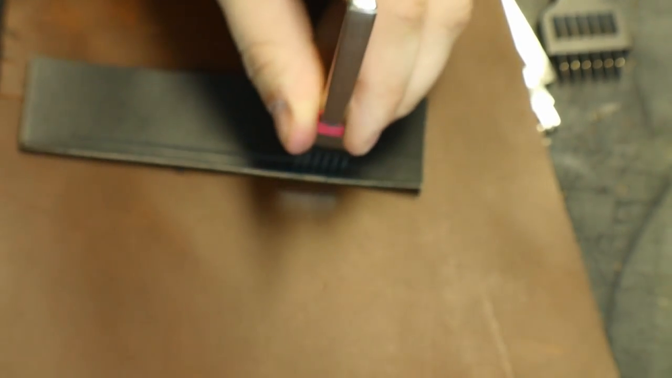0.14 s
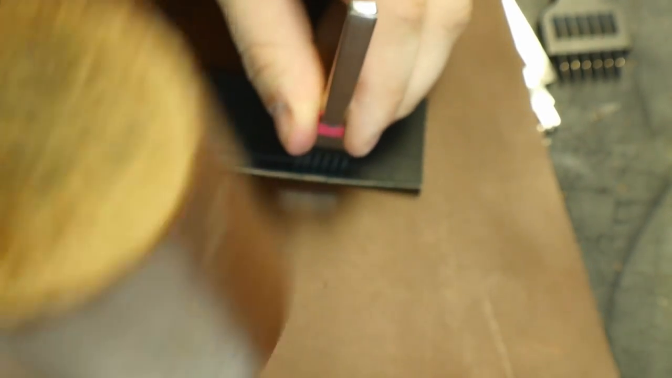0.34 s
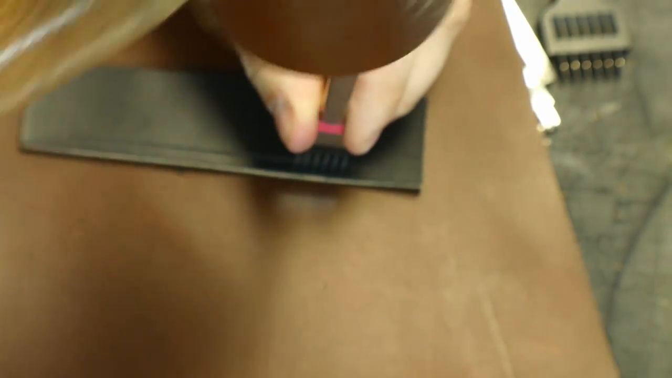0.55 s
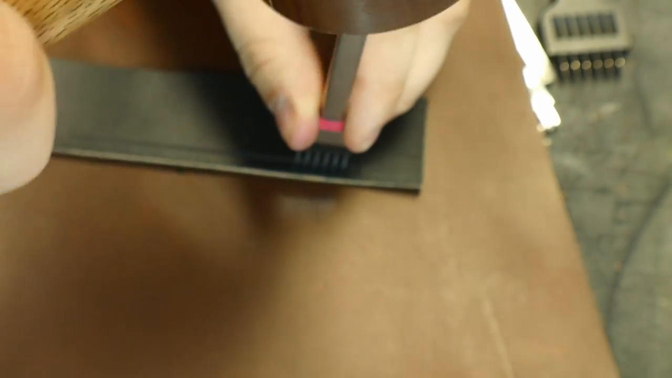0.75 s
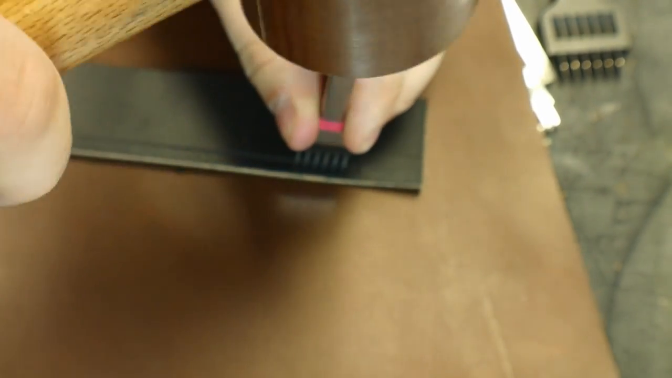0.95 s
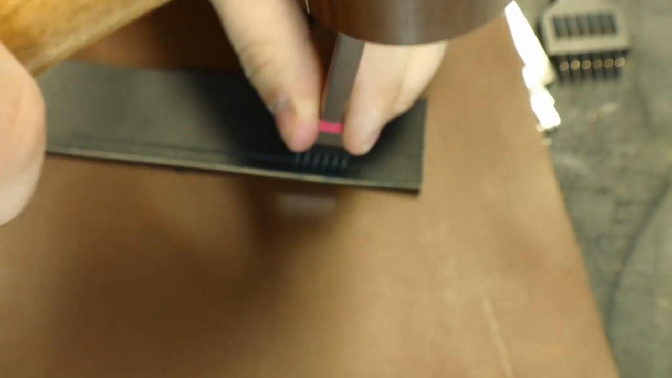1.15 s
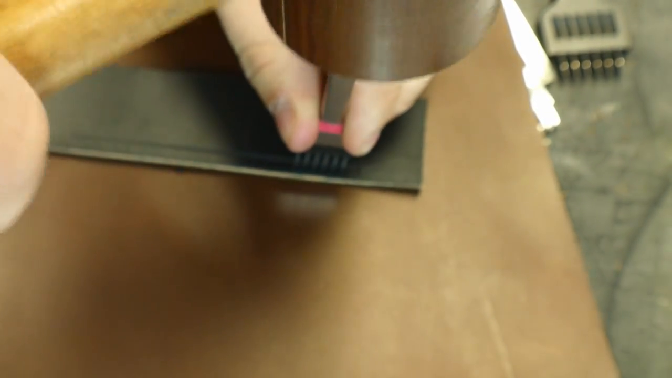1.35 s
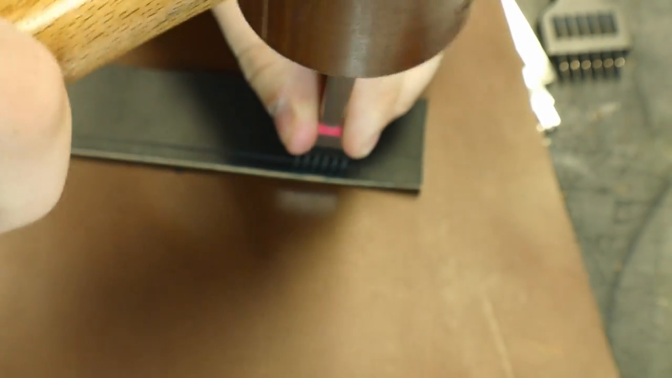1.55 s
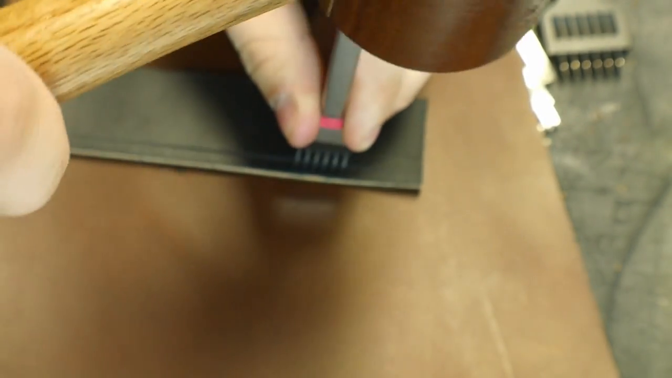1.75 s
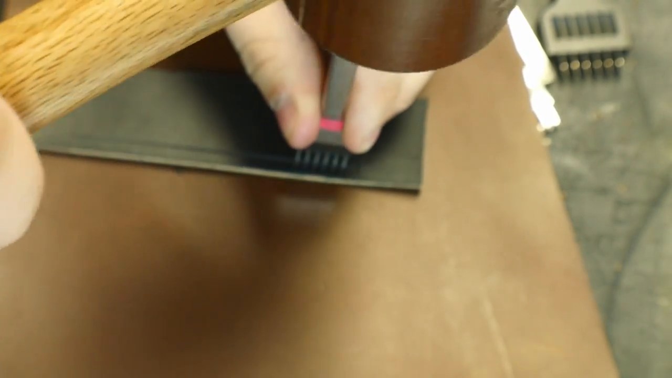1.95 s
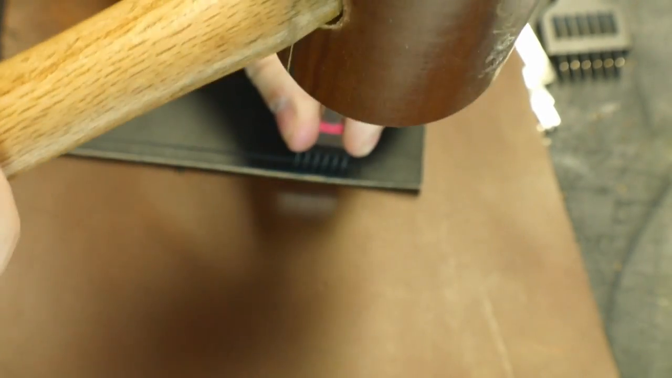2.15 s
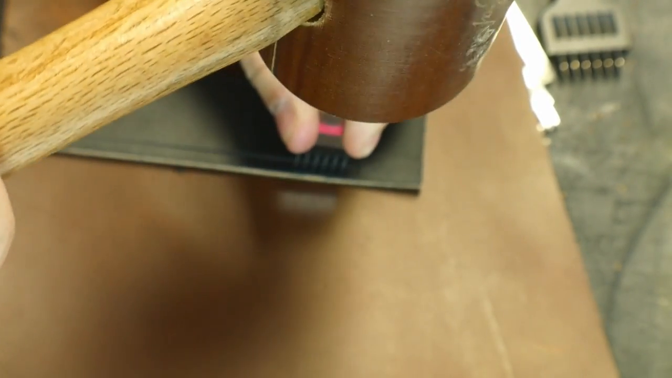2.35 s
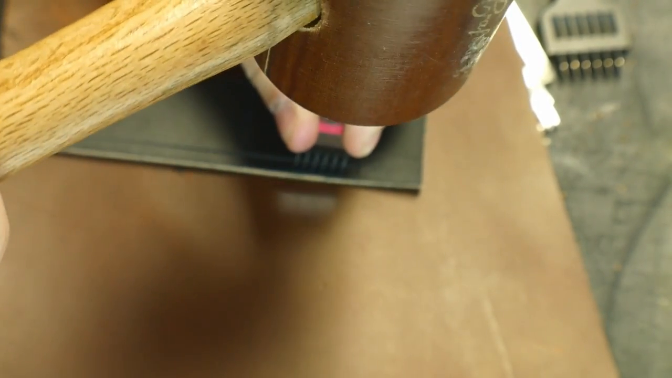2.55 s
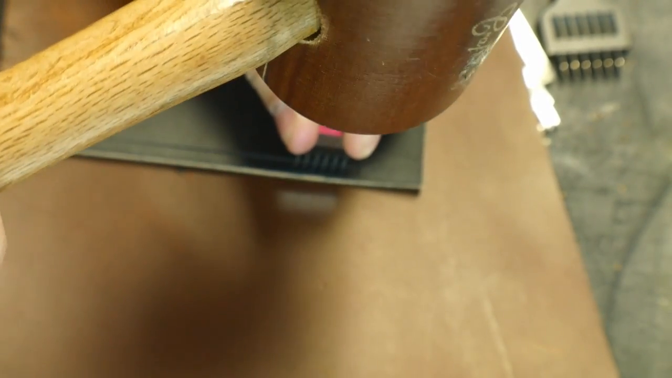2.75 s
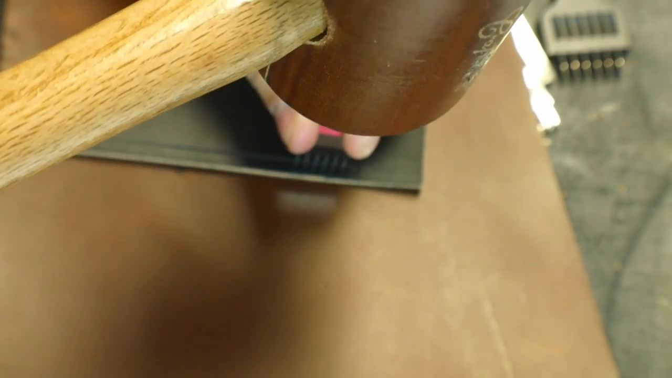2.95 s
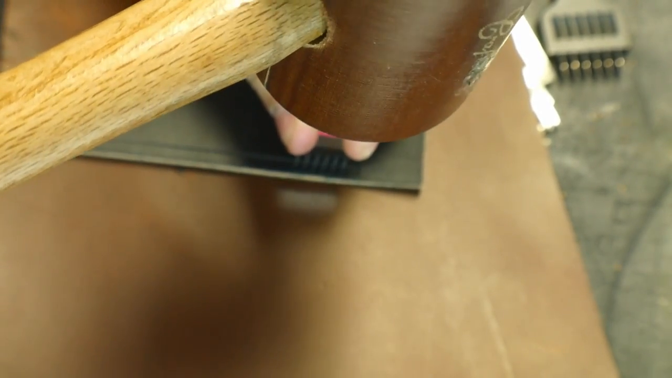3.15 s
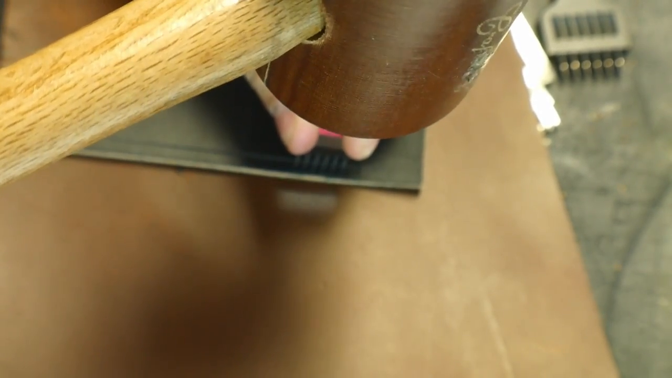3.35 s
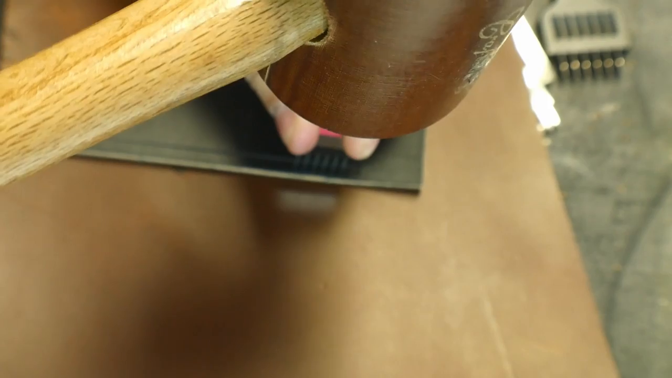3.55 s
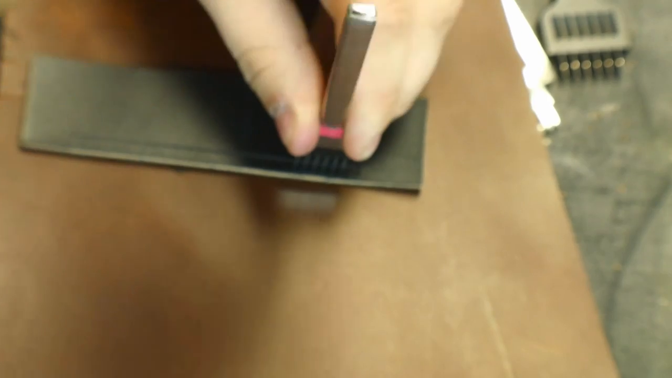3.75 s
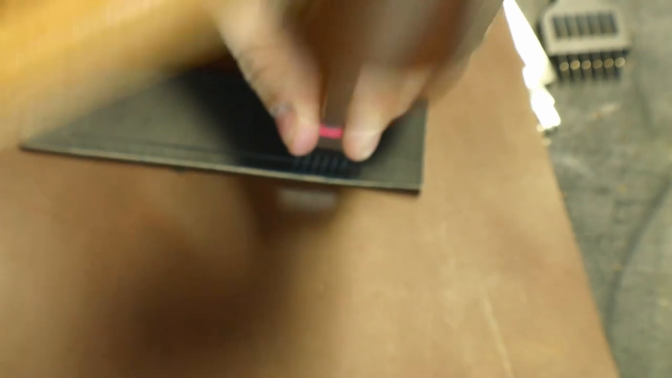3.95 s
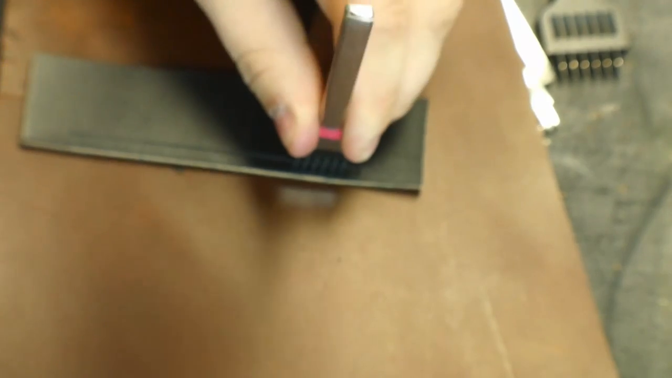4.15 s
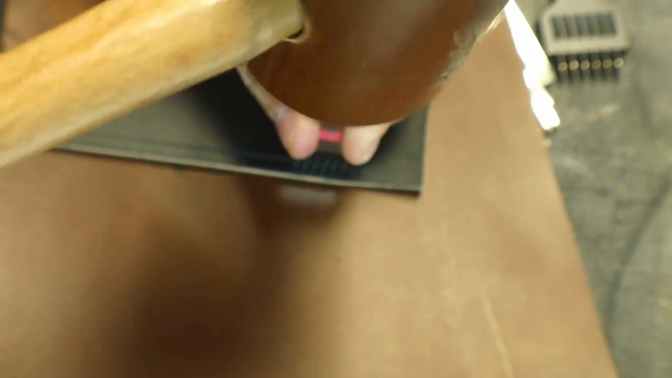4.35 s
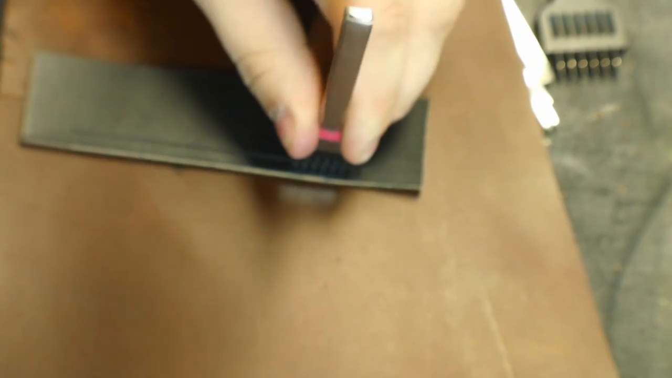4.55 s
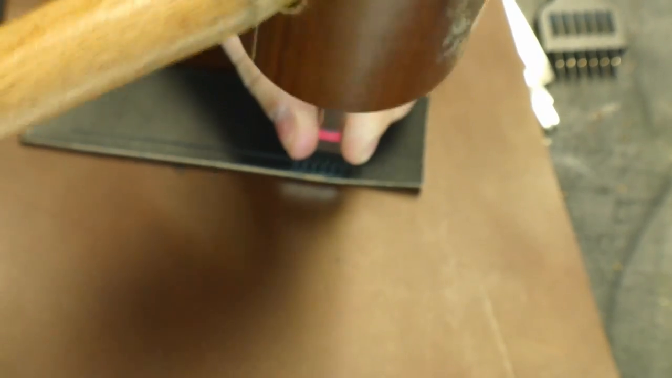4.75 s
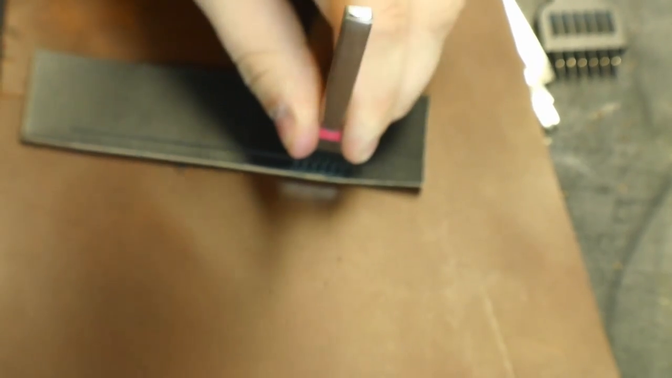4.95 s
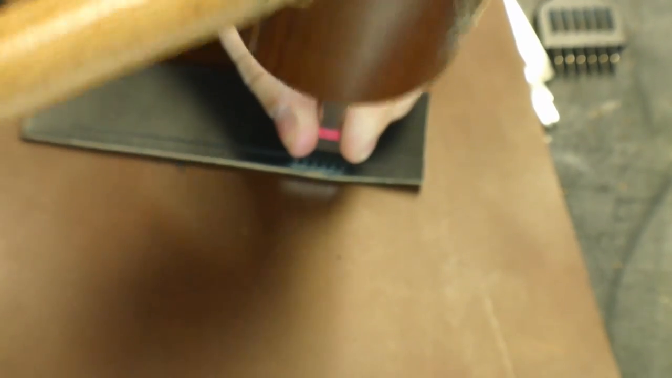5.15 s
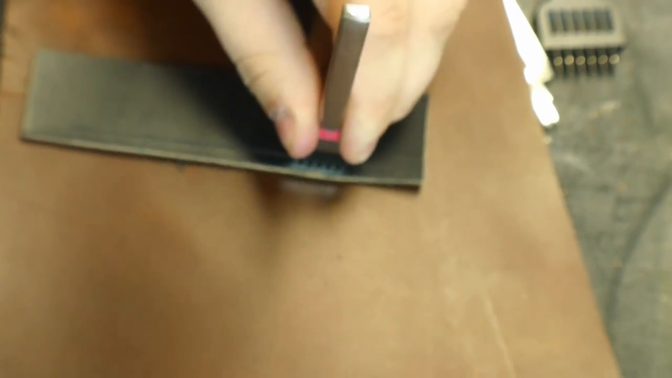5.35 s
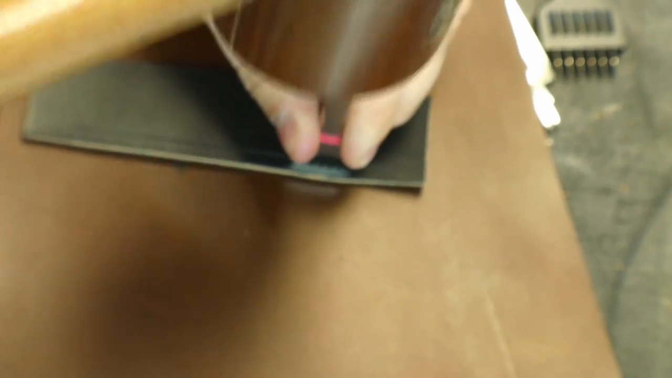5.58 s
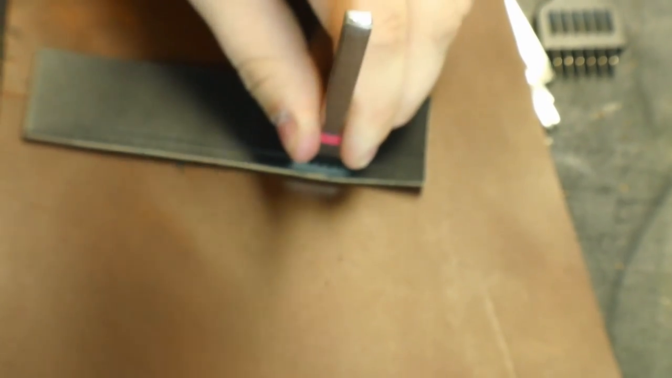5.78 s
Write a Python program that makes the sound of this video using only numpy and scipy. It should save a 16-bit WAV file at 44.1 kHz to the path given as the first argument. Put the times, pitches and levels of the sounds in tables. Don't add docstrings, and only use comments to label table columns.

```python
import sys
import numpy as np
from scipy import signal
from scipy.io import wavfile
from scipy.ndimage import uniform_filter1d, minimum_filter1d

SR = 44100
rng = np.random.default_rng(int(sys.argv[2]) if len(sys.argv) > 2 else 0)


def unload_audio(sound):
    columns = np.transpose(np.atleast_2d(sound))
    steps = np.round(np.clip(columns, -1, 1) * 32767)
    wavfile.write(sys.argv[1], SR, steps.astype(np.int16))


def linear_from_db(decibels):
    return 10 ** (np.asarray(decibels, float) / 20)


N = 256560

# t/s, force/dB over full scale, mallet head/dB, upper bending mode/dB, main mode f/Hz
BLOWS = [
    (4.0274, 12.5, -7.5, 6.5, 4060),
    (4.409, 17, -6, 6, 4344),
    (4.7673, 17.5, -5, -0.8, 4025),
    (5.1423, 15.5, -0.5, -8.5, 3876),
    (5.5527, 12, 2.2, 1.1, 4090),
]
# low mode f/Hz, level/dB, upper mode f/Hz, damping factor, treble/dB
GRIP = [(3105, 9.5, 5300, 0.96, 7.5), (2964, 9, 4000, 1.18, 4), (3210, 1.5, 5172, 1.29, -3.5),
        (3128, 3, 4800, 1.07, -8), (3330, 1.9, 4370, 1.14, -1.3)]
# teeth mode f/Hz, teeth level/dB, block level/dB
TEETH = [(5580, -8, 4), (5200, -5, -3.8), (5640, 0.9, -6.5), (5290, 0.5, -6), (5791, 10, -13)]
# level/dB at each of the four shades, thin line level/dB
SENT = [(4, -2.5, -1.6, -5, -19), (1, -1, -1, -4.5, -26), (0.5, 0.5, 2, 0.5, -3), (-2, 0, -2, -0.5, 1),
        (-8, 0.5, 2.2, -1, -16)]
# f/Hz, width/Hz, level/dB
IRON = [(3267, 560, 0), (4000, 530, 5), (4806, 640, 4.5), (5615, 960, 1.5), (6360, 424, -11),
        (2800, 820, -11), (9230, 460, -21.5), (11220, 440, -10), (13370, 1350, -5.5)]
# f/Hz, width/Hz, level/dB
HEAD = [(1450, 223, -5)]
# f/Hz, width/Hz, level/dB
BLOCK = [(425, 400, -14), (940, 230, -24), (2020, 240, -12.5)]
# f/Hz, width/Hz, level/dB
THIN = [(8800, 25, -47)]
# f/Hz, width/Hz, level/dB
SING = [(8200, 12, -55), (9250, 22, -47), (11200, 30, -40), (3600, 31, -46), (1450, 58, -18.5),
        (12270, 30, -54)]
HEAD_LATE_S = 0.00043
SAG_SHARE, SAG_MS = 0.06, 0.7
PUSH_DB, PUSH_MS = -6, 1.27

# t/s, peak level/dB, hardness/dB, bench knock/dB, edge mode/dB
TAPS = [(1.014, -2, -7, -27, -1.5), (1.4297, -1.5, -3.5, -23, -33), (1.4713, -4, -15, -26.5, -20),
        (1.49, -9, -17, -33, -22), (1.503, -18, -26.5, -31.5, -18), (1.512, -21, -18, -41, -14),
        (1.597, -29, -13, -44, -14), (1.639, -16.5, -34, -47, -14.5), (2.3486, -10.5, -0.5, -27.5, 14),
        (2.385, -6, -30.5, -67, -14), (4.441, -17.5, -5, -26.5, 15)]
# f/Hz, width/Hz, level/dB
WOOD = [(925, 206, 5), (226, 178, -2), (1464, 190, 6.5), (1986, 170, 4.5), (3660, 160, 1.5),
        (4500, 1520, 22), (3370, 230, -2), (1027, 140, -8), (6250, 460, -17), (8800, 1700, -18)]
# f/Hz, width/Hz
EDGE = (2760, 330)
# f/Hz, level/dB per Hz
EDGE_TAIL = [(2200, -30), (2500, 1), (2850, 0), (3100, -31)]
# f/Hz, level/dB per Hz
TAP_COLOUR = [(180, -47), (300, -31), (492, -9.5), (940, 1), (1220, -6.5), (1550, -3), (1800, -4.5),
              (2130, -2), (2600, -18), (3660, -15), (7550, -30), (12000, -52), (15600, -83), (22000, -120)]
TAP_EDGE_HZ = 10800
OFF_CENTRE = 0.57
TAIL_DB, TAIL_PER_HARD = -32.5, 0.59

# f/Hz, width/Hz, level/dB
BENCH = [(136.3, 11.1, 1), (264, 5, -10), (253.8, 8.8, -7.5)]
# f/Hz, width/Hz, level/dB
BENCH_LIGHT = [(132.5, 11.4, 1.5), (260, 18, -10.5), (196, 44, 4), (333, 37, -50)]
# f/Hz, width/Hz, level/dB
STAND = [(96.85, 2.48, 1), (112, 2.1, -30), (22.16, 1.5, -4)]

# t/s, peak level/dB, ring f/Hz, dull body/dB, length/ms
TICKS = [(0.281, -52, 5000, -9, 2.2), (0.3407, -42, 6100, -20, 2.5), (0.6489, -36.5, 1250, -16, 3.3),
         (0.767, -35, 3750, -13, 3.5), (0.817, -37, 3680, -4, 3), (1.561, -34, 4000, -15, 2.2),
         (1.574, -37, 5500, -15, 2.2), (1.606, -40, 6000, -15, 2.2), (1.637, -39, 3200, -15, 2.5),
         (1.6508, -34.5, 1390, -2, 3), (1.718, -34.5, 3300, -15, 4), (1.736, -27.5, 4560, -18, 3),
         (1.753, -27, 1410, -11, 2.5), (1.7677, -28, 1280, -3, 2.7), (1.9181, -33.5, 6270, -16, 4.3),
         (1.9355, -33.5, 6250, -13, 3.9), (1.9667, -38, 6000, -18, 1.6), (2.0687, -23.5, 3660, 21, 3.7),
         (2.1654, -38, 3200, 28, 3.5), (2.2867, -34.5, 3820, -37, 3), (2.946, -39.5, 2540, -11, 4),
         (2.995, -37.5, 2800, -25, 3), (3.044, -36, 2600, -20, 4.9), (3.171, -48, 1350, -11, 4.4),
         (3.869, -39, 1250, -17, 2.3), (3.8776, -34, 3000, -10, 2.2), (3.8975, -32.5, 3570, -14, 1.8),
         (3.9163, -33, 3280, -3, 2), (3.935, -35, 3800, 20, 2.4), (3.9474, -32, 3420, -22, 1.8),
         (3.9558, -36, 5500, -17, 1.6), (3.9595, -32, 3300, -13, 2.3), (4.6656, -25, 2800, -3, 5.7),
         (4.791, -15.5, 2800, -21, 6), (5.156, -16.5, 1450, -16, 4.8), (5.408, -26, 1200, 1, 5.5),
         (5.438, -26, 3260, -5, 3.2), (5.442, -20.5, 3100, -11, 4.7), (5.4465, -23, 6360, -2, 4)]
# f/Hz, level/dB per Hz
TICK_COLOUR = [(180, -25), (300, 12.5), (2480, 1.5), (3510, 11), (4660, 2.5), (6390, 2.5), (7730, -9),
               (10100, -9.5), (13000, -18)]
# t/s, f/Hz, width/Hz, level/dB, rise/ms
TOUCHES = [(0.0, 1260, 10.6, -39.5, 3), (0.075, 1262, 7.2, -54, 4.6), (.135, 6550, 15, -48, 12),
           (.488, 6150, 78, -43, 4), (.5285, 8300, 500, -41, .3), (.5288, 9900, 260, -42, 0.34),
           (.529, 10900, 500, -43, .3), (.648, 1260, 67, -43, 1.5), (.68, 6650, 60, -49, 3),
           (.70, 3700, 14, -43, 33), (1.4113, 3670, 230, -31, 0.4), (1.775, 6270, 20, -44, 11),
           (2.5, 1520, .3, -62, 49)]

# t/s, peak level/dB, swing f/Hz, number of swings
PUFFS = [(4.665, -8, 52, 1.4), (4.692, -18, 45, 1.1), (4.738, -14, 27, 2.4), (5.422, -8, 53, 1.45),
         (5.466, -16, 32, 1.5), (5.505, -12, 21.5, 2.6), (3.9342, -27, 120, .9), (3.9165, -34, 130, 1.1),
         (3.947, -35, 140, 1.1), (3.956, -34, 150, 1.2), (3.5, -41, 45, 4), (3.54, -44, 140, 9),
         (3.76, -42, 60, 8)]

# f/Hz, level/dB per Hz
RING_COLOUR = [(180, -34), (300, -3.5), (366, 5.5), (392, -6), (486, -3.5), (614, -6), (713, -7),
               (1040, -7.5), (1170, -11), (1560, -7.5), (2000, -11), (4440, -5), (11100, -21), (13800, -34),
               (16000, -53)]
# f/Hz, loss/dB per s
RING_FADE = [(300, 34.5), (1500, 0), (4000, 1.5), (7000, 29), (10000, 68), (15000, 52)]
# f/Hz, width/Hz, level/dB
RING_BANDS = [(1450, 310, 6), (2510, 520, -2.5), (3300, 680, 2), (6350, 1000, 3.5), (8100, 470, 6.5),
              (9050, 300, 3), (11260, 500, 0), (11900, 400, -7)]
# f/Hz, width/Hz
SHADES = [(3230, 330), (4250, 920), (5400, 720), (7350, 1700)]
# f/Hz, level/dB
FIRST = [(1000, -1.5), (1500, -4), (2600, 0), (3250, 0), (3900, -3.5), (5000, -0.5), (8000, 0),
         (12000, -1.5)]
RING_DB, RING_PER_HEAD = -32.5, 0.095
EARLY_DB, EARLY_S = 11, 0.014
HOLD_S, SAG_DB_PER_S, FALL_DB_PER_S = 0.22, 6.5, 60.5
GUST_DB, GUST_S = 2, 0.11
ARRIVE_MS = 6.9

# t/s, rumble level/dB, sharpness/dB, hold/s
JOLTS = [(0, -49.5, 3.5, 0.015), (0.329, -52.5, 6, 0.12), (0.44, -58, 4.5, 0.06), (0.54, -57, 4.5, 0.06),
         (0.767, -50.5, -16, 0.033), (1.022, -34, -3.5, 0.074), (1.283, -62, -6, 0.046),
         (1.441, -33.5, -3, 0.16), (1.73, -50, -12, 0.038), (2.057, -47, -17, .02), (2.16, -55, -12, 0.026),
         (2.358, -43, 0.5, 0.12), (2.595, -56, 1, 0.041), (2.87, -50.5, -2.5, 0.079),
         (3.458, -47, -4.5, 0.17), (3.694, -51.5, -0.5, 0.23), (3.903, -50.5, 6, 0.025),
         (4.02, -32, -0.5, 0.23), (4.44, -35, 1.5, 0.16), (4.628, -29.5, -0.5, 0.024),
         (4.788, -36, 2.5, 0.21), (5.394, -28, -3.5, 0.074), (5.172, -35, 0.5, .2), (5.563, -34.5, 1, 0.19)]
JOLT_RISE_S = 0.021
# offset/dB, share of sharpness, fall/dB per s, rest level/dB
RUMBLE = (-2, 1, 46, -60)
# offset/dB, share of sharpness, fall/dB per s, rest level/dB
BOOM = (-1, 0.24, 69, -65)
# offset/dB, share of sharpness, fall/dB per s, rest level/dB
DRUM = (-7.5, 2, 117, -67.5)
# f/Hz, level/dB per Hz
BOOM_COLOUR = [(60, -31), (75, 14.5), (100, 16), (135, 15), (165, -48)]
# f/Hz, level/dB per Hz
DRUM_COLOUR = [(130, -37), (160, 3), (200, -4), (255, 2.5), (300, -9), (400, -15.5), (520, -15.5),
               (650, -43.5)]
# t/s, level/dB
RUSTLE = [(0.0, -46), (0.18, -56), (0.86, -58), (1.47, -57.5), (1.6, -53.5), (1.93, -52), (2.13, -60),
          (2.9, -59), (3.27, -60), (3.94, -59.5), (4.02, -58)]
# f/Hz, level/dB per Hz
RUSTLE_COLOUR = [(180, -58), (300, 13), (478, -10), (738, -4.5), (1120, 1), (1250, 1), (1620, -1.5),
                 (6270, -11), (7130, -14.5), (14000, -24)]
# f/Hz, level/dB per Hz
AIR = [(15, -8), (25, 2), (134, 0), (191, -6), (244, -3), (397, -13.5), (467, -6), (565, -11.5), (664, -11),
       (1540, -17.5), (2650, -25), (3870, -23.5), (4550, -30.5), (14600, -31.5), (16300, -51)]
AIR_DB, AIR_PATCH_DB = -53, 1.8
# f/Hz, width/Hz, level/dB
HUM = [(105, 8.6, -75), (248, 2.2, -64.5), (1505, 7.8, -74.5), (3280, 35, -71.5), (3800, 33, -69.5),
       (4430, 45, -77.5)]
# f/Hz, level/dB per Hz
HISS = [(24, -39), (40, -21), (284, -25), (384, -5), (425, 8), (1690, -6), (4870, -5), (13600, -8),
        (16300, -23)]
HISS_DB = -72.5


def evened(x):
    return x / np.sqrt(np.mean(x ** 2) + 1e-20)


def read(points, hz):
    f, value = np.transpose(points)
    return np.interp(np.log(hz + 1), np.log(f + 1), value)


def add(mix, s, sound):
    part = mix[round(s * SR):][:len(sound)]
    part += sound[:len(part)]


def noise(colour, loss=None, patchy_db=0.0, size=512):
    t = np.arange(4 * N // size + 5) * size / 4 / SR
    hz = np.fft.rfftfreq(size, 1 / SR)
    a, b, patches = rng.standard_normal((3, len(t), len(hz)))
    if patchy_db:
        patches = uniform_filter1d(patches, size=20, axis=0)
        patches = evened(uniform_filter1d(patches, size=6, axis=1))
    z = (a + 1j * b) * linear_from_db(read(colour, hz) + patchy_db * patches)

    def back(z):
        return signal.istft(z.T, nperseg=size, noverlap=3 * size // 4)[1][:N]

    scale = np.std(back(z))
    if loss:
        z = z * linear_from_db(-loss(t[:, None], hz))
    return back(z) / scale


def ring(modes, rise_ms=0.041, count=2500, sag=0.0):
    t = np.arange(count) / SR
    bent = t + sag * SAG_MS / 1000 * (1 - np.exp(-1000 * t / SAG_MS))
    out = sum(-linear_from_db(db) * np.exp(-np.pi * w * t) * np.sin(2 * np.pi * f * bent) for f, w, db in modes)
    return out * (1 - np.exp(-1000 * t / rise_ms))


def push(level_db):
    x = 1000 * np.arange(600) / SR / PUSH_MS
    return linear_from_db(level_db) * x * np.exp(-x)


def blows():
    out, t = np.zeros(N), np.arange(600) / SR
    band = signal.butter(2, [2600, 5800], "band", fs=SR, output="sos")
    for blow, grip, teeth, sent in zip(BLOWS, GRIP, TEETH, SENT):
        s, force_db, head_db, upper_db, main_hz = blow
        low_hz, low_db, upper_hz, damping, treble_db = grip
        teeth_hz, teeth_db, block_db = teeth
        iron = np.array(IRON, float)
        iron[:4, 0] = low_hz, main_hz, upper_hz, teeth_hz
        iron[:4, 1] *= damping
        iron[[0, 2, 3], 2] += low_db, upper_db, teeth_db
        iron[iron[:, 0] > 8000, 2] += treble_db
        crack = signal.sosfilt(band, rng.standard_normal(len(t))) * np.exp(-t / 0.0019)
        add(out, s, linear_from_db(force_db) * ring(iron, sag=SAG_SHARE))
        add(out, s, linear_from_db(force_db - 14) * crack)
        add(out, s, linear_from_db(force_db + block_db) * ring(BLOCK, rise_ms=0.9))
        add(out, s, push(PUSH_DB))
        add(out, s, linear_from_db(sent[-1]) * ring(THIN, rise_ms=6.0, count=9000))
        add(out, s + HEAD_LATE_S, linear_from_db(force_db + head_db) * ring(HEAD, rise_ms=0.82))
        add(out, s, ring(SING, rise_ms=2.2, count=9000))
        add(out, s, bench(BENCH, -20.0, -20.0))
    return out


def taps():
    out, tail, edge = np.zeros(N), np.zeros(N), np.zeros(N)
    t = np.arange(SR) / SR
    for s, peak_db, hard_db, knock_db, edge_db in TAPS:
        modes = [(*EDGE, edge_db)]
        for f, w, db in WOOD:
            softened_db = 0.9 * hard_db * max(np.log2(f / 1200), 0)
            taken_db = OFF_CENTRE * max(edge_db, 0) * (1800 < f < 4000)
            modes.append((f, w, db + softened_db - taken_db))
        body = ring(modes, rise_ms=1.39 * linear_from_db(-0.4 * hard_db))
        snap = linear_from_db(hard_db + 1.5) * np.exp(-((t[:2500] - 0.00025) / 0.00009) ** 2)
        grit = uniform_filter1d(np.diff(rng.standard_normal(301)), size=3) * np.exp(-t[:300] / 0.0024)
        add(out, s, linear_from_db(peak_db - 3.0) * (body - snap))
        add(out, s, linear_from_db(peak_db + hard_db - 18.5) * grit)
        add(out, s, push(knock_db + 6.0))
        add(out, s, bench(BENCH_LIGHT, knock_db, -1.2))
        tail_db = peak_db + TAIL_PER_HARD * hard_db + TAIL_DB
        add(tail, s, linear_from_db(2 * (tail_db - 60 * t / 0.53)) * np.minimum(t / 0.0012, 1))
        add(edge, s, linear_from_db(2 * (tail_db + edge_db - 19.5 - 60 * t / 0.5)) * np.minimum(t / 0.006, 1))
    soft = signal.sosfilt(signal.butter(8, TAP_EDGE_HZ, fs=SR, output="sos"), out)
    return soft + np.sqrt(edge) * noise(EDGE_TAIL) + np.sqrt(tail) * noise(TAP_COLOUR, patchy_db=1.5)


def bench(modes, knock_db, sway_db):
    late = np.zeros(round(0.009 * SR))
    top = -np.append(late, ring(modes, rise_ms=0.8, count=40000))[:40000]
    return linear_from_db(knock_db) * (top + linear_from_db(sway_db) * ring(STAND, rise_ms=150.0, count=40000))


def puffs():
    out, t = np.zeros(N), np.arange(-0.15, 0.15, 1 / SR)
    for s, peak_db, hz, swings in PUFFS:
        swing = np.cos(2 * np.pi * hz * t) * np.exp(-(2 * t * hz / swings) ** 2)
        add(out, s - 0.15, -linear_from_db(peak_db) * swing)
    return out


def ticks():
    out, shape = np.zeros(N), np.zeros(N)
    t, crackle = np.arange(900) / SR, noise(TICK_COLOUR)
    for s, peak_db, hz, body_db, ms in TICKS:
        modes = [(hz, 700 / ms, 0), (600, 350, body_db - 14.0)]
        add(shape, s, linear_from_db(peak_db - 8.0) * np.exp(-1000 * t / ms) * np.minimum(t / 0.00015, 1))
        add(out, s, linear_from_db(peak_db - 5.0) * ring(modes, rise_ms=0.37, count=900))
    for s, hz, width, db, rise_ms in TOUCHES:
        add(out, s, ring([(hz, width, db)], rise_ms, count=26000))
    return out + shape * crackle


def workshop():
    starts, t = np.array([row[0] for row in BLOWS]), np.arange(N) / SR

    def last(t):
        return np.maximum(np.searchsorted(starts, t) - 1, 0)

    def bump(hz, f, w):
        return np.exp(-(2 * (hz - f) / w) ** 2)

    def loss(t, hz):
        since = np.maximum(t - starts[last(t + 0.004)], 0)
        bands = sum(db * bump(hz, f, w) for f, w, db in RING_BANDS)
        shade = sum(db[last(t)] * bump(hz, f, w) for (f, w), db in zip(SHADES, np.transpose(SENT)))
        return since * read(RING_FADE, hz) - bands - shade - (t < starts[1]) * read(FIRST, hz)

    wash = noise(RING_COLOUR, loss, patchy_db=0.8)
    age = t - starts[last(t)]
    level_db = RING_DB + RING_PER_HEAD * np.array(BLOWS)[last(t), 2]
    level_db += EARLY_DB * np.exp(-abs(age) / EARLY_S)
    level_db -= SAG_DB_PER_S * age + FALL_DB_PER_S * np.maximum(age - HOLD_S, 0)
    for s, peak_db, hz, swings in PUFFS:
        if peak_db > -10:
            level_db -= GUST_DB * np.clip((t - s) / GUST_S, 0, 1) * (t - s < age)
    gap = np.clip(1000 * age / ARRIVE_MS, 0.3, 1) ** 2
    return wash * linear_from_db(level_db) * gap * (t > starts[0])


def shake(colour, offset_db, share, fall_db, rest_db):
    t = np.arange(0, N, 32) / SR
    power = np.full(len(t), linear_from_db(2 * rest_db))
    for s, db, sharp_db, hold in JOLTS:
        level_db = db + offset_db + share * sharp_db - fall_db * np.maximum(t - s - hold, 0)
        power += linear_from_db(2 * level_db) * np.clip((t - s) / JOLT_RISE_S, 0, 1) ** 2
    return np.interp(np.arange(N) / SR, t, np.sqrt(power)) * noise(colour, size=4096)


def background():
    t = np.arange(N) / SR
    first = BLOWS[0][0]
    duck_db = 2.9 * (t > first)
    out = linear_from_db(AIR_DB + 1.0 - duck_db) * noise(AIR, patchy_db=AIR_PATCH_DB, size=2048)
    for hz, width, db in HUM:
        r = np.exp(-np.pi * width / SR)
        drift = signal.lfilter([1], [1, -r], rng.standard_normal(N) + 1j * rng.standard_normal(N))
        out += linear_from_db(db) * evened((drift * np.exp(2j * np.pi * hz * t)).real)
    out += linear_from_db(np.interp(t, *np.transpose(RUSTLE))) * (t < first) * noise(RUSTLE_COLOUR, patchy_db=2.5)
    out += shake([(15, 13.0), (28, 7.0), (45, 13.0), (62, 13.5), (80, -49.0)], *RUMBLE)
    out += shake(BOOM_COLOUR, *BOOM)
    return out + shake(DRUM_COLOUR, *DRUM)


def scene():
    mid = blows() + taps() + ticks() + puffs() + workshop() + background()
    side = linear_from_db(HISS_DB) * noise(HISS)
    return np.array([mid + side, mid - side])


def starve(x):
    hz, t, z = signal.stft(x, SR, nperseg=1024, noverlap=512)
    power = abs(z.mean(0)) ** 2
    bias = uniform_filter1d(rng.standard_normal((128, len(t))), size=25, axis=1) * 5
    bands = power[:512].reshape(128, 4, -1).mean(1) * linear_from_db(2 * 3.5 * bias)
    bands = np.repeat(bands, 4, 0)
    mids, bass = power[(hz > 1000) & (hz < 6000)].mean(0), power[hz < 200].mean(0)
    mask = np.maximum(mids * linear_from_db(2 * -26.0), bass * linear_from_db(2 * -62.0))
    drop = (bands < minimum_filter1d(mask, size=3)) & (hz[:512, None] > 7500)
    z[:, :512] *= np.where(drop, linear_from_db(-17.0), 1)
    spans = len(t) // 4 + 1
    chance = rng.standard_normal((65, spans)) + 1.2 * rng.standard_normal(spans)
    apart = np.repeat(np.repeat(chance > 0.5, 8, 0), 4, 1)[:len(hz), :len(t)]
    z = z.mean(0) + (z - z.mean(0)) * apart * linear_from_db(7.0)
    return signal.istft(z, SR, nperseg=1024, noverlap=512)[1][:, :N]


def top_cut(x):
    return signal.sosfilt(signal.butter(12, 16420, fs=SR, output="sos"), x)


def record(dry):
    clipped = np.clip(dry, -1, 1)
    bright = signal.lfilter([1, -1], [1, -0.96], clipped[0])
    stray = linear_from_db(-28.0) * bright * evened(uniform_filter1d(rng.standard_normal(N), size=20))
    thinned = starve(clipped + [stray, -stray])
    limited = signal.oaconvolve(thinned, signal.firwin(255, 15500, fs=SR)[None], "same")
    return top_cut(np.clip(limited, -1, 1))


dry = scene()
out = record(dry)
unload_audio(out)
```